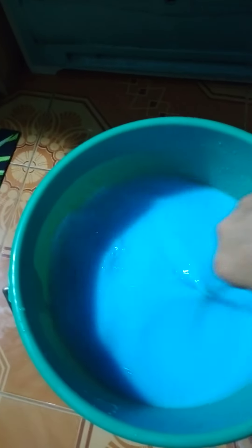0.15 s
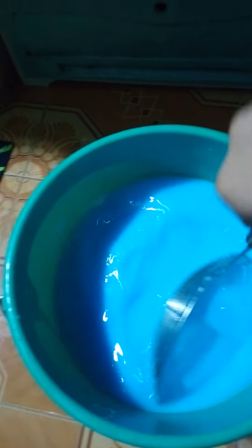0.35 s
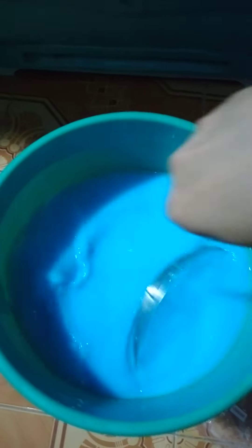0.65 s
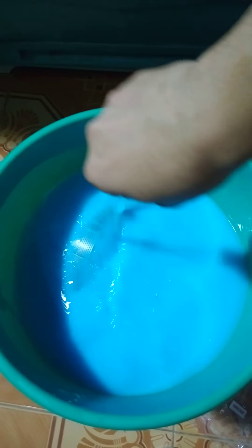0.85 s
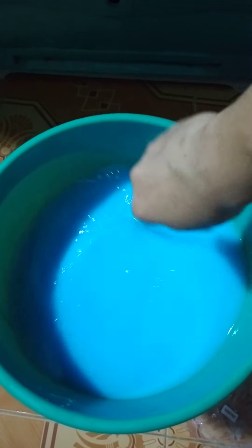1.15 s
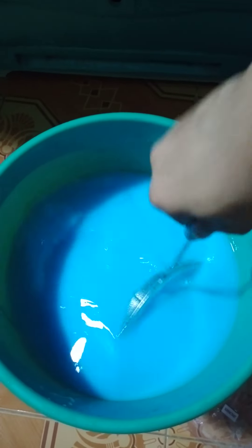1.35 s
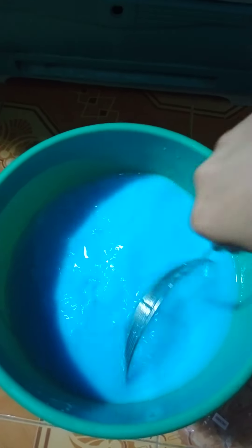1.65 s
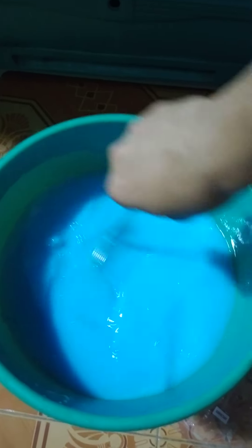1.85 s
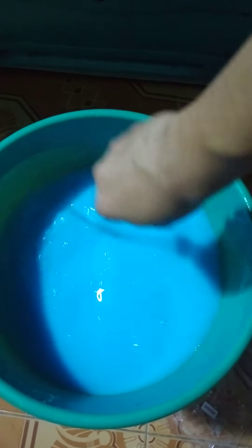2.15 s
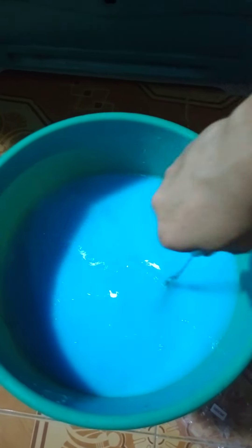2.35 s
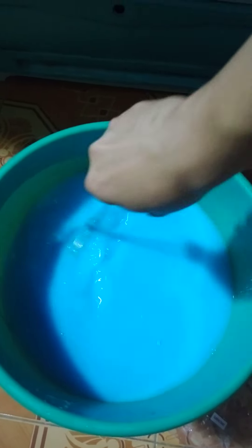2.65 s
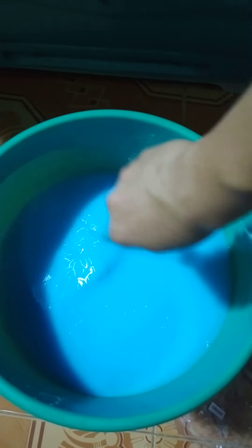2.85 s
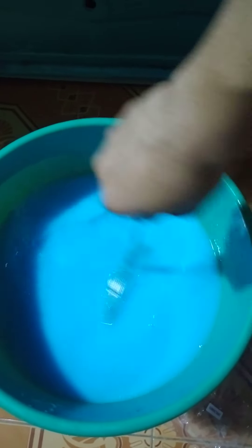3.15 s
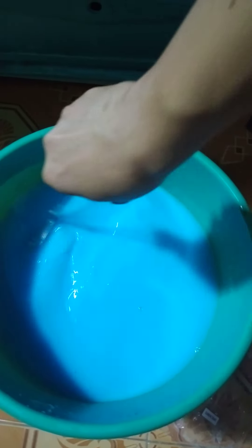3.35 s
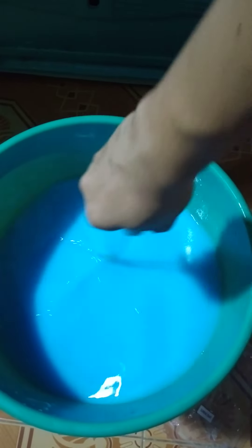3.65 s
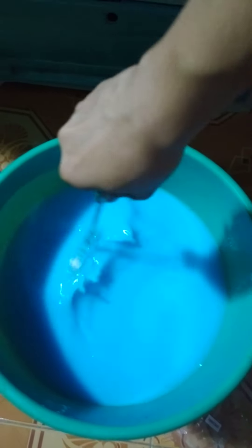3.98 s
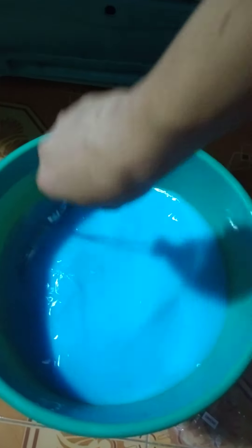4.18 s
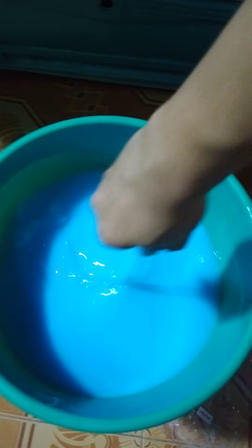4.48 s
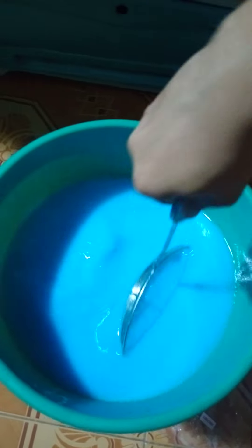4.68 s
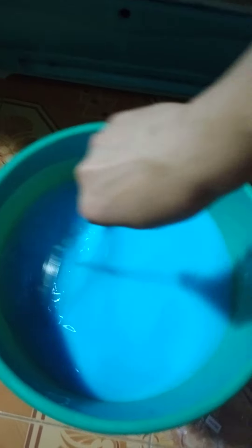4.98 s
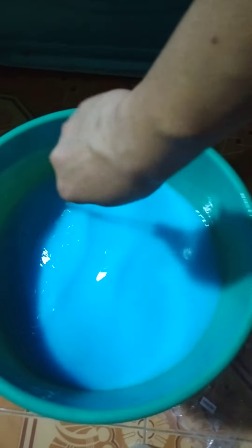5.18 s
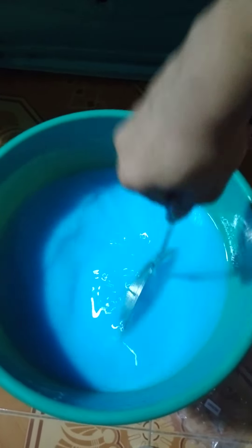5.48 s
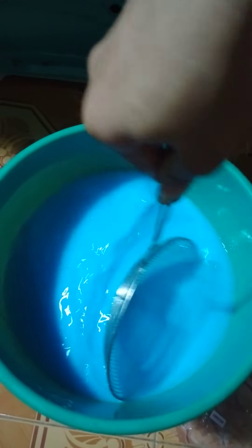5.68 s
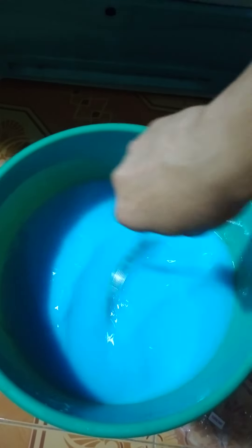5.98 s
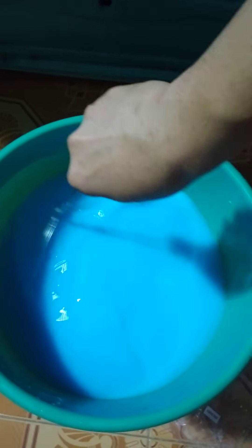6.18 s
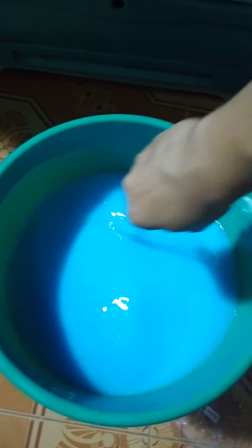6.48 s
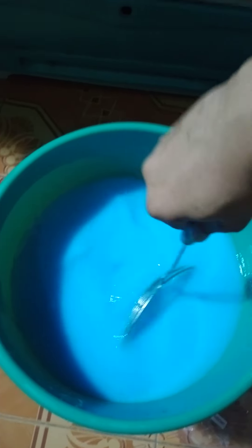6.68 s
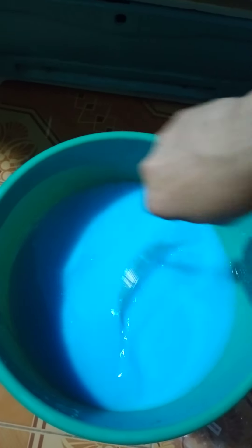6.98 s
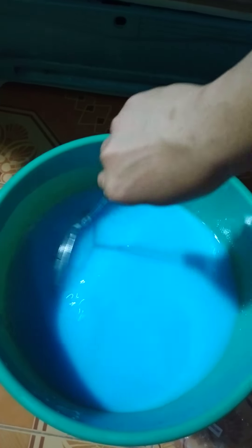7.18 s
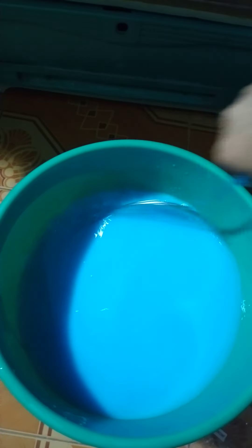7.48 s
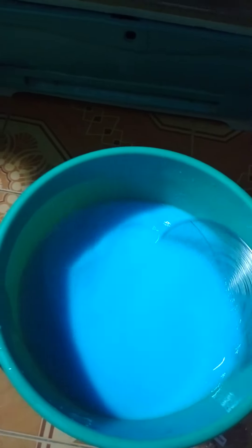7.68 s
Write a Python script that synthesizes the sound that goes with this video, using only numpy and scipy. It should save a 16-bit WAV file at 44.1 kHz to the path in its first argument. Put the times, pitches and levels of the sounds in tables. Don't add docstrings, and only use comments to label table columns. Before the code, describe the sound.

A thick liquid is stirred with a wire skimmer in a plastic bucket, heard close on a bright phone microphone in a small hard room. A quick cluster of hollow knocks with metallic rattle falls at 0.2-0.6 s, followed by a surge and draining fizz. More clacks come near 1.0, 1.4, 1.65 and 2.05 s, then a sharp double at 2.4. Strong doubled blows hit at 3.06 and 3.8 s, the latter among the loudest, with others at 4.2 and 4.6. After a wetter, quieter gap around 4.9, a splashy swirl rises at 5.2, then bright hits at 5.5 and 5.8. Knocks crowd together from 6.25 to 6.85 s. Weak taps near 7.25 lead into grainy wire scrapes, drips and sloshing to the end at about 7.8. Short room echoes follow the blows; faint motor hum and low rumble persist beneath.

```python
import sys
import numpy as np
from scipy import signal
from scipy.fft import rfft, irfft, next_fast_len
from scipy.io import wavfile
from scipy.ndimage import uniform_filter1d, map_coordinates

SR = 44100
rng = np.random.default_rng(int(sys.argv[2]) if len(sys.argv) > 2 else 0)


def gain_from_decibels(decibels):
    exponent = np.asarray(decibels, float) / 20
    return 10 ** exponent


def persist_wave(psi):
    counts = np.round(np.clip(psi, -1, 1) * 32767).astype(np.int16)
    wavfile.write(sys.argv[1], SR, np.atleast_2d(counts).T)


N = 345303


def unit(x):
    return x / np.sqrt(np.mean(x ** 2) + 1e-20)


def filtered(x, response):
    m = next_fast_len(N + 8192)
    return irfft(rfft(x, m) * response(np.fft.rfftfreq(m, 1 / SR)), m)[:N]


def along(points, f):
    hz, db = np.transpose(points)
    return gain_from_decibels(np.interp(np.log(f + 1), np.log(hz + 1), db))


def resonant(x, modes):
    edge = 1 / (0.76 * modes[0][0])

    def shape(f):
        low_cut = ((1j * f * edge) ** 2 / (1 + 1.4j * f * edge - (f * edge) ** 2)) ** 2
        total = 0
        for k, (centre, width, db) in enumerate(modes):
            peak = 1j * f * width / (centre * centre - f * f + 1j * f * width)
            total = total + (-1) ** k * gain_from_decibels(db) * peak
        return low_cut * total

    def response(f):
        gain = shape(f)
        return gain / np.sqrt(np.mean(abs(gain) ** 2))

    return filtered(x, response)


def echoed(x, db):
    lag = round(0.0098 * SR)
    return x + gain_from_decibels(db) * np.pad(x, (lag, 0))[:len(x)]


def hiss(spectrum, patchy_db, grain_db):
    grains = uniform_filter1d(rng.exponential(1, N + 512), 8)
    spiky = rng.standard_normal(N + 512) * gain_from_decibels(grain_db * grains)
    z = signal.stft(spiky, nperseg=512)[2]
    field = uniform_filter1d(uniform_filter1d(rng.standard_normal(z.shape), 6, 0), 10, 1)
    x = signal.istft(z * gain_from_decibels(patchy_db * unit(field)), nperseg=512)[1][:N]
    return unit(filtered(x, lambda f: along(spectrum, f)))


def droplets(count):
    when, pitch = rng.random(count), rng.standard_normal(count)
    size = np.minimum(rng.exponential(1, count), 3)
    t = np.arange(600) / SR
    hz = 2200 * np.exp(.35 * pitch)[:, None]
    cycles = hz * t * (1 + 8 * t)
    fade = gain_from_decibels(-60 * cycles / 30) * (1 - np.exp(-cycles))
    pops = gain_from_decibels(4.6 * size)[:, None] * np.sin(2 * np.pi * cycles) * fade
    at = (when * N).astype(int)[:, None] + np.arange(len(t))
    return unit(np.bincount(at.ravel(), pops.ravel(), N + len(t))[:N])


# f/Hz, level/dB per Hz
AIR_COLOUR = [(12, -39), (24, -56), (44, 5), (137, 1), (635, -7.5), (1470, -12), (2050, -14.5),
              (3580, -11.5), (5400, -32), (8500, -16.5), (10900, -34), (15700, -35)]
# f/Hz, level/dB per Hz
RUMBLE_COLOUR = [(35, -44), (60, -13), (80, 11.5), (105, -7), (130, 14), (160, 3), (200, -1), (260, -36)]
# f/Hz, width/Hz, level/dB
LOW_HUM = (127, 7.9, -65.5)
# t/s, level/dB
HUM_LOAD = [(0, -58), (1.3, -63.5), (2.7, -62), (4, -63), (5.2, -62.5), (6.8, -61.5), (7.83, -69.5)]


def room():
    hz, width, hum_db = LOW_HUM
    s, load_db = np.transpose(HUM_LOAD)
    sway_db = 3 * map_coordinates(rng.standard_normal(50), [np.arange(N) * 6 / SR])
    load = gain_from_decibels(np.interp(np.arange(N) / SR, s, load_db - load_db.mean()) + sway_db)
    hum = unit(resonant(rng.standard_normal(N), [(hz, width, 0)]))
    air = hiss(AIR_COLOUR, patchy_db=.7, grain_db=0)
    rumble = hiss(RUMBLE_COLOUR, patchy_db=2, grain_db=0)
    return gain_from_decibels(-56.5 - 5.0) * air + load * (gain_from_decibels(hum_db) * hum + gain_from_decibels(-60.5) * rumble)


# t/s, slosh level/dB
ARM_EFFORT = [(0, -57), (.62, -67), (.95, -57), (1.25, -51.5), (1.75, -62), (2.15, -57.5), (2.7, -62),
              (3.35, -61), (3.66, -81), (3.78, -72), (4.05, -59), (4.2, -59), (4.9, -63), (5.2, -49.5),
              (5.42, -69), (6.2, -58.5), (7.0, -56.5), (7.62, -54)]
# t/s, half length/s, fizz level/dB
DRAININGS = [(0.026, 0.11, -74), (0.676, 0.12, -56.5), (1.19, 0.15, -68), (1.768, 0.18, -69.5),
             (2.33, 0.06, -67), (2.64, 0.074, -64.5), (2.92, 0.1, -70), (3.198, 0.14, -72),
             (3.556, 0.094, -62.5), (4.03, 0.14, -68), (4.51, 0.3, -71), (5.15, 0.16, -65),
             (5.72, 0.15, -66.5), (5.932, 0.085, -75), (6.452, 0.22, -72), (6.925, 0.69, -67.5),
             (7.354, .07, -63.5), (7.677, 0.25, -64.5)]
# f/Hz, level/dB per Hz
SLOSH_COLOUR = [(60, -62), (120, -2), (200, -4.5), (437, -7), (483, -13), (1200, -9.5), (1410, -9),
                (6000, -27.5), (7800, -39), (13200, -120)]
# f/Hz, level/dB per Hz
FIZZ_COLOUR = [(2710, -25), (4600, -4), (5150, -19), (5450, -6), (6290, -3.5), (7010, 1), (8430, 7.5),
               (11000, -7), (15700, -12)]


def stirring():
    t = np.arange(0, N + 64, 64) / SR
    wake, drain = 0, 0
    for s, knock_db, *_ in FIRM_BLOWS:
        u = np.maximum(t - s, 0) / 0.088
        wake = wake + gain_from_decibels(-40 + 0.92 * knock_db) * (u * np.exp(1 - u)) ** 2
    for s, half, db in DRAININGS:
        drain = drain + gain_from_decibels(db - 15.5 * abs((t - s) / half) ** 1.7)
    effort = gain_from_decibels(np.interp(t, *np.transpose(ARM_EFFORT))) + wake + gain_from_decibels(-11) * drain
    fizzing = drain + gain_from_decibels(-87)
    effort = np.interp(np.arange(N) / SR, t, effort)
    fizzing = np.interp(np.arange(N) / SR, t, fizzing)
    swirl = hiss(SLOSH_COLOUR, patchy_db=2, grain_db=5)
    slosh = effort * gain_from_decibels(-5.5) * (swirl + gain_from_decibels(-9.0) * droplets(count=900))
    fizz = hiss(FIZZ_COLOUR, patchy_db=2.3, grain_db=10)
    return slosh + fizzing * gain_from_decibels(5.0) * fizz


# t/s, knock level/dB, belly relative level/dB, metal relative level/dB
FIRM_BLOWS = [(0.011, -26, -16.5, -9), (0.223, -12.5, -10.5, -15), (0.507, -18.5, -17, -11.5),
              (0.5435, -11.5, -15, -13.5), (1.016, -28.5, -6, -7), (1.3794, -16.5, -15, -11),
              (1.644, -10.5, -16.5, -15), (2.029, -21, -23, -14), (2.36, -11, -16, -17.5),
              (2.764, -24, -26, -13), (3.06, -7.5, -19.5, -20.5), (3.431, -20.5, -12, -18),
              (3.584, -24, -17, -12.5), (3.782, -5.5, -17, -25), (4.17, -12, -14.5, -17.5),
              (4.458, -17.5, -20, -17.5), (4.602, -11, -14, -16), (5.0718, -22.5, -15, -11),
              (5.423, -23.5, -22, -16), (5.496, -14, -16, -9), (5.708, -24.5, -16, -14.5),
              (5.795, -12.5, -13.5, -9), (6.26, -22.5, -10, -16), (6.419, -21, -18.5, -12),
              (6.583, -14.5, -20.5, -14.5), (6.697, -15, -15.5, -10), (6.839, -11.5, -15.5, -14.5),
              (7.221, -22.5, -21.5, -17), (7.308, -27.5, -14, -16), (0.282, -15, -20, -19)]
# t/s, knock level/dB, belly relative level/dB, metal
# relative level/dB
FURTHER_KNOCKS = [(0.251, -12, -20.5, -13.5), (0.356, -24, -20, -28), (0.589, -35, 2, -15),
                  (0.629, -21, -19, -31), (1.002, -29.5, -15, -7), (1.039, -17, -19, -20),
                  (1.518, -29, -20, -18), (1.732, -29, -10.5, -14), (2.047, -19, -13.5, -16),
                  (2.384, -9, -16, -13), (2.498, -22, -16.5, -25), (2.79, -16, -17.5, -24),
                  (2.817, -25, -11.5, -17.5), (2.833, -24.5, -9, -19), (2.862, -24.5, -19.5, -11.5),
                  (3.078, -8.5, -19, -15), (3.408, -30, -13, -8), (3.463, -24, -18.5, -16),
                  (3.804, -16, -12.5, -8.5), (3.837, -18.5, -9.5, -29), (4.197, -26, -10, -14),
                  (4.214, -21, -25, -18.5), (5.128, -24, -16.5, -23), (5.565, -20, -12.5, -33),
                  (5.887, -20.5, -19.5, -21.5), (6.235, -23, -16.5, -16), (6.29, -21.5, -15, -14.5),
                  (6.624, -18.5, -15.5, -18.5), (6.755, -19.5, -11.5, -32), (6.767, -21.5, -15, -16)]
# t/s, knock level/dB, metal relative level/dB
LIGHT_TOUCHES = [(0.092, -53.5, 2.5), (1.09, -46, -19), (1.142, -49, -1), (1.217, -44, -4.5),
                 (1.305, -40.5, -14), (1.337, -27.5, -25), (1.763, -48, -17), (2.238, -34, -7.5),
                 (2.253, -50, 2.5), (2.922, -40, -0.5), (3.492, -31, -19), (3.512, -25, -21), (3.564, -54, 1),
                 (3.626, -53.5, 9.5), (4.352, -35, -7), (4.408, -45.5, -1.5), (4.487, -24, -16.5),
                 (5.204, -46.5, -3), (5.171, -44.5, -4), (5.251, -45, -1), (5.614, -36, -15),
                 (6.368, -48, -1), (6.894, -44, -7), (7.062, -54, 3.5), (7.521, -39, -10.5),
                 (7.556, -38, -11.5), (2.685, -58, 3), (7.689, -37.5, -9.5), (2.748, -62, -1),
                 (2.847, -39, -8), (6.307, -30.5, -14), (1.398, -31, -14), (1.414, -31, -10),
                 (7.298, -42, -7), (4.504, -33, -17)]


def contacts():
    grazes = [(s, db, -17, metal) for s, db, metal in LIGHT_TOUCHES]
    s, knock, belly, metal = np.transpose(FIRM_BLOWS + FURTHER_KNOCKS + grazes)
    ring = -2 + 0.31 * (metal + 15) + 0.017 * (knock + 22.0)
    rim = knock + metal
    return np.column_stack([s, knock + belly, knock, rim, rim - 5, ring])


# f/Hz, width/Hz, level/dB
BELLY_MODES = [(276, 13.2, 1), (379.6, 13.6, 3), (426.6, 26, -2), (516.6, 77, 2.5), (546, 61, 1),
               (559.2, 25.8, 3), (617, 88, -3), (855, 246, -6)]
# f/Hz, width/Hz, level/dB
WALL_MODES = [(936, 69, 0), (1105, 107, -1.5), (1352, 111, 3), (1429, 31, -3), (1466, 16, -3),
              (1630, 263, -0.5), (2366, 510, -5.5), (2526, 234, -6.5)]
# f/Hz, width/Hz, level/dB
RIM_MODES = [(2575, 700, 10.45), (3605, 380, 11.3), (3820, 193, 13.1), (4430, 740, 0.5)]
# f/Hz, width/Hz, level/dB
WIRE_MODES = [(5270, 3100, -2.5), (7246, 1040, 9), (7575, 730, 10), (8605, 760, 7.5), (10230, 3000, -14.5),
              (15000, 4900, -44)]
# blow t60/s, after-ring t60/s, after-ring level/dB, offset/dB, first push (factor)
PART_DECAY = [
    (0.03, 0.35, 1, 3.5, 2.5),
    (0.02, 0.32, -6, -5.5, 1.15),
    (0.014, 0.33, -12.5, 8.5, 0.28),
    (0.009, 0.33, -14, 11, 1.2),
]
PART_ECHO = [-16, -16, -15, -11]


def taps():
    t, out, rows = np.arange(SR // 3) / SR, np.zeros(N), contacts()
    shakes = rng.standard_normal((len(rows), 4, len(t)), dtype=np.float32)
    hardness = np.clip((rows[:, 2:3] + 40) / 25, 0, 1)
    rattle = rng.standard_normal((len(rows), 1, len(t)), dtype=np.float32)
    rattle = unit(uniform_filter1d(rattle, 130))
    shakes *= gain_from_decibels(2.25 * rattle * (1 - np.exp(-t / 0.0013))).astype(np.float32)
    for part, modes in enumerate([BELLY_MODES, WALL_MODES, RIM_MODES, WIRE_MODES]):
        blow_t60, ring_t60, ring_db, offset_db, crack = PART_DECAY[part]
        blow = echoed(gain_from_decibels(-60 * t / blow_t60), PART_ECHO[part])
        ring = gain_from_decibels(ring_db - 60 * t / ring_t60) * (1 - np.exp(-t / 0.0014))
        shakes[:, part, :3] = crack * hardness
        drive = np.zeros(N + SR)
        for row, shake in zip(rows, shakes[:, part]):
            level = gain_from_decibels(row[1 + part] + offset_db - 7.5)
            drive[round(row[0] * SR):][:len(t)] += level * (blow + gain_from_decibels(row[5]) * ring) * shake
        out += resonant(drive[:N], modes)
    return out


# f/Hz, width/Hz, level/dB
LOW_BUCKET_MODES = [
    (128.6, 8.5, 2.5),
    (195, 39, -4.5),
]


def thuds():
    push = np.zeros(N)
    for s, knock_db, *_ in FIRM_BLOWS:
        push[round(s * SR)] = gain_from_decibels(knock_db - 10)
    return resonant(push, LOW_BUCKET_MODES)


# t/s, f/Hz, level/dB
BELLY_STRIKES = [(0.016, 307, -44), (0.2234, 825, -29), (0.2513, 551, -24), (0.2803, 481, -34),
                 (0.5437, 554, -31), (1.0166, 506, -36.5), (1.0395, 446, -37), (1.6442, 597, -32.5),
                 (2.0462, 474, -38.5), (2.359, 462, -34), (2.384, 372, -41), (2.7886, 670, -43),
                 (3.0599, 472, -40), (3.0784, 361, -33), (3.4321, 582, -38), (3.4615, 390, -39),
                 (3.5853, 290, -44.5), (3.7818, 484, -31.5), (3.8033, 373, -29.5), (4.1694, 507, -29),
                 (4.197, 559, -39), (4.4588, 551, -34), (4.6014, 530, -30), (5.0714, 546, -42),
                 (5.4964, 278, -38.5), (5.7069, 580, -45), (5.7947, 374, -25), (6.2896, 462, -37),
                 (6.4193, 297, -39.5), (6.5829, 535, -41), (6.6248, 395, -41), (6.6962, 275, -37),
                 (6.8379, 555, -36), (7.3098, 407, -43.5)]
# t/s, f/Hz, level/dB
WALL_STRIKES = [(0.2234, 861, -41), (0.223, 1080, -27.5), (0.2514, 994, -24), (0.2513, 1470, -34),
                (0.281, 1110, -38), (0.281, 1420, -31), (0.5074, 1220, -38), (0.5082, 1480, -36),
                (0.5442, 1330, -23), (0.542, 1630, -30), (1.016, 1165, -39), (1.039, 1320, -42),
                (1.0393, 1620, -39), (1.3803, 1467, -32), (1.3796, 1590, -48), (1.6441, 1340, -24.5),
                (1.6458, 1630, -26), (2.0293, 1340, -36), (2.048, 1355, -30.5), (2.359, 1370, -32),
                (2.361, 1630, -23.5), (2.384, 1640, -28), (2.384, 2330, -24.5), (2.7895, 1350, -35),
                (3.061, 1335, -27), (3.0596, 1630, -24.5), (3.0787, 926, -38), (3.0782, 1620, -27),
                (3.4317, 1790, -37), (3.586, 1440, -42), (3.782, 1330, -29), (3.7818, 1630, -23.5),
                (3.8033, 2260, -31), (3.8038, 2680, -31), (4.1687, 1357, -31), (4.1697, 1820, -34),
                (4.198, 1370, -34), (4.197, 1680, -37), (4.215, 947, -33), (4.215, 1340, -36),
                (4.46, 1305, -38), (4.603, 1315, -24.5), (4.6006, 1750, -33.5), (5.4964, 1870, -36),
                (5.4964, 2270, -29), (5.796, 1700, -31), (6.262, 1370, -33.5), (6.2603, 1540, -42),
                (6.2905, 1010, -34), (6.2898, 1520, -36), (6.4197, 1390, -37), (6.4176, 1720, -42),
                (6.583, 1130, -40), (6.5835, 1366, -30.5), (6.6247, 1395, -32.5), (6.697, 1475, -25.5),
                (6.6962, 2270, -33), (6.8391, 1400, -27)]
# t/s, f/Hz, level/dB
RIM_STRIKES = [(0.012, 2700, -38.5), (0.2234, 3860, -25.5), (0.2517, 3820, -29), (0.2803, 3800, -34.5),
               (0.507, 3850, -44), (0.5437, 3540, -27), (1.0166, 3780, -36.5), (1.0395, 3830, -49),
               (1.3787, 3260, -27), (1.379, 3790, -28), (1.6442, 3500, -37), (2.0296, 3270, -38),
               (2.0462, 3280, -37), (2.359, 2820, -36), (2.7886, 3800, -38.5), (3.0584, 3500, -46),
               (3.0784, 2350, -36), (3.4316, 3300, -40), (3.4615, 3700, -40), (3.5856, 3880, -42),
               (3.7818, 3360, -36), (3.8033, 3890, -25.5), (4.169, 3270, -31), (4.197, 3900, -39),
               (4.214, 3800, -39), (4.4588, 2780, -40), (4.601, 3220, -46), (5.4977, 2860, -31),
               (5.7947, 3300, -24.5), (6.2627, 2800, -38), (6.2904, 3700, -36), (6.4194, 3150, -35),
               (6.5829, 3880, -48), (6.696, 3800, -27.5), (6.8384, 3550, -36)]
# t60/s, rise/s, offset/dB, echo level/dB
RING_SHAPES = [
    (0.13, 0.0038, 4, -20.5),
    (0.035, 0.00072, 7.5, -18),
    (0.015, 0.00036, 9, -27),
]


def rings():
    t, out = np.arange(SR // 3) / SR, np.zeros(N)
    strikes = [BELLY_STRIKES, WALL_STRIKES, RIM_STRIKES]
    for table, (t60, rise, offset_db, echo_db) in zip(strikes, RING_SHAPES):
        part = np.zeros(N + SR)
        fade = gain_from_decibels(offset_db - 60 * t / t60) * (1 - np.exp(-t / rise))
        for s, hz, db in table:
            part[round(s * SR):][:len(t)] += gain_from_decibels(db) * fade * np.sin(2 * np.pi * hz * t)
        out += echoed(part[:N], echo_db)
    tail_t60_s, tail_rise_s, tail_db = 0.33, 0.0043, -8
    tail = rng.standard_normal(len(t)) * gain_from_decibels(-60 * t / tail_t60_s) * (1 - np.exp(-t / tail_rise_s))
    return out + gain_from_decibels(tail_db) * signal.fftconvolve(out, tail / np.linalg.norm(tail))[:N]


# t/s, length/s, f/Hz, level/dB
FAR_TONES = [(.088, .04, 1160, -55), (.025, .055, 2250, -54), (.94, .06, 1070, -61), (1.28, .1, 1630, -54),
             (2.27, .08, 2290, -64), (4.015, .05, 1180, -57), (4.06, .11, 1210, -57), (4.88, .12, 866, -65),
             (4.955, .11, 1235, -62), (6.46, .06, 2300, -59), (7.715, .05, 1430, -55),
             (.013, .07, 1490, -49), (.228, .08, 572, -32), (4.458, .08, 575, -41), (2.236, .045, 350, -53),
             (.012, .025, 1100, -46), (5.49, .07, 262, -46), (5.51, .07, 1550, -41),
             (.468, .045, 1130, -56), (.135, .09, 1620, -61), (.13, .08, 1110, -63),
             (3.04, .025, 1240, -55), (.85, .04, 2250, -63), (1.17, .06, 1020, -60), (.93, .05, 700, -63),
             (.235, .07, 1394, -35), (.265, .045, 830, -38)]
# t/s, f/Hz, level/dB
DRIP_PINGS = [(4.852, 3500, -62), (.75, 3500, -60), (.885, 1250, -59), (1.213, 2850, -53),
              (4.96, 2950, -61), (2.249, 3850, -55), (2.237, 2530, -48), (2.25, 2260, -45),
              (7.22, 1020, -46), (2.69, 1800, -57), (3.02, 1240, -58), (4.01, 2830, -61),
              (4.535, 1650, -52), (5.25, 3080, -53), (5.25, 1700, -55), (5.28, 1480, -55),
              (5.445, 2900, -55), (6.48, 3230, -52), (7.06, 2250, -59), (7.515, 2900, -55),
              (7.553, 1400, -48), (7.594, 1350, -52), (7.685, 2250, -53), (3.555, 7400, -58),
              (4.406, 3950, -54), (4.959, 4050, -59), (.088, 2720, -55), (7.688, 1500, -51),
              (7.688, 2800, -55), (7.56, 1000, -56), (7.518, 1500, -57), (1.333, 1420, -51),
              (1.345, 2250, -56), (3.089, 1500, -30), (3.108, 1450, -37), (7.62, 3900, -58),
              (6.742, 3750, -45), (.592, 1370, -38), (1.21, 950, -55), (2.681, 4050, -58),
              (2.745, 3900, -63), (5.802, 1480, -35), (4.617, 1400, -35)]


def tones():
    out = np.zeros(N)
    drips = [(s, .021, hz, db) for s, hz, db in DRIP_PINGS]
    for s, length, hz, db in FAR_TONES + drips:
        u = np.arange(round(length * SR)) / SR
        wander = np.cumsum(rng.standard_normal(SR // 4))[:len(u)]
        drift = 3.6e-5 * max(hz, 1300) * wander
        swell = np.sin(np.pi * (u / length) ** .5)
        out[round(s * SR):][:len(u)] += gain_from_decibels(db + 3.5) * swell * np.sin(2 * np.pi * hz * u + drift)
    return out


# t/s, peak level/dB
BRIGHT_TICKS = [(0.223, -35), (0.5072, -30), (0.5445, -25), (1.0016, -34), (1.0395, -46), (1.2002, -38),
                (1.379, -21), (2.0282, -25.5), (2.384, -18.5), (2.765, -31), (3.059, -31), (3.0774, -15.5),
                (3.3955, -36), (3.4072, -42), (3.7808, -32), (3.8023, -18), (4.4578, -39), (4.6019, -25),
                (5.0714, -44), (5.497, -17.5), (5.7069, -36), (5.798, -22), (6.2335, -37), (6.2896, -45),
                (6.582, -29), (6.696, -25), (6.837, -30),
                (0.412, -49), (0.4434, -50), (0.8724, -46), (0.883, -49), (0.9144, -48), (1.1129, -41),
             (1.189, -38), (2.6833, -53), (2.8609, -50), (3.3124, -55), (4.9616, -45), (6.1439, -44),
             (7.0628, -55), (7.3894, -56)]


def ticks():
    t, drive = np.arange(SR // 20) / SR, np.zeros(N + SR)
    shape = gain_from_decibels(-60 * t / 0.0057) + gain_from_decibels(-15.5 - 60 * t / .05)
    for s, db in BRIGHT_TICKS:
        shake = rng.standard_normal(len(t))
        drive[round(s * SR):][:len(t)] += gain_from_decibels(db - 6.5) * shape * shake
    return resonant(echoed(drive[:N], -13.0), [(8460, 1100, 16.0), (12700, 2700, 2), (15200, 3400, 4.5)])


SINGING_WIRES = [3040, 3600, 5490, 6800, 7900, 8250, 8500, 8800]
TOP_WIRES = [12570, 13600, 15110, 15640]
# t/s, length/s, level/dB, top wires relative level/dB
WIRE_SONGS = [
    (2.6, .08, -66, -14),
    (7.095, .125, -74, 0),
]


def singing():
    t, out = np.arange(N) / SR, np.zeros(N)
    width_hz = 110
    low = unit(resonant(rng.standard_normal(N), [(hz, width_hz, 0) for hz in SINGING_WIRES]))
    top = unit(resonant(rng.standard_normal(N), [(hz, width_hz, 0) for hz in TOP_WIRES]))
    for s, length, db, top_db in WIRE_SONGS:
        gate = np.clip(np.minimum((t - s) / .005, (s + length - t) / .02), 0, 1)
        out += gain_from_decibels(db) * gate * (low + gain_from_decibels(top_db) * top)
    return out


# t/s, half length/s, level/dB
WALL_DRAGS = [
    (2.637, 0.052, -64.5),
    (7.37, 0.1, -59),
    (7.616, 0.051, -52.5),
    (7.727, 0.066, -56),
]


def scrapes():
    t = np.arange(N) / SR
    press = sum(gain_from_decibels(db - 13.3 * ((t - s) / half) ** 2) for s, half, db in WALL_DRAGS)
    grains = uniform_filter1d(rng.exponential(1, N), size=40)
    rub = rng.standard_normal(N) * gain_from_decibels(7 * grains)
    rim = unit(resonant(rub, RIM_MODES))
    wall = unit(resonant(rub, WALL_MODES))
    return press * (rim + gain_from_decibels(-4.5) * wall + gain_from_decibels(-5.5) * droplets(count=1500))


def scene():
    background = room() + stirring()
    struck = taps() + thuds() + rings()
    small = tones() + ticks() + singing() + scrapes()
    return (background + struck + small)[None]


def low_pass(x):
    return signal.sosfilt(signal.butter(12, 17150, fs=SR, output="sos"), x)


# f/Hz, level/dB
MICROPHONE_TONE = [(60, -6.5), (200, -2), (300, -1), (13500, -2), (15300, -1), (15750, 4)]
# f/Hz, level/dB
TOP_LIMIT = [(15800, 0), (15900, -22), (16600, -26), (17100, -60)]


def record(dry):
    heard = filtered(dry[0], lambda f: along(MICROPHONE_TONE, f) * along(TOP_LIMIT, f))[None]
    return low_pass(heard)


dry = scene()
out = record(dry)
persist_wave(out)
```